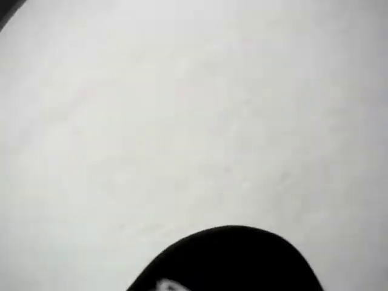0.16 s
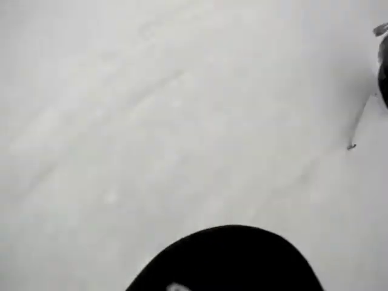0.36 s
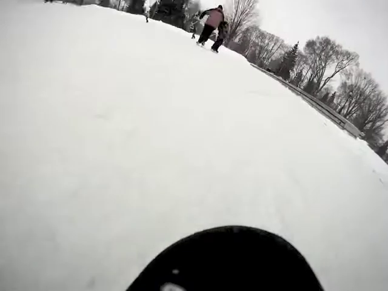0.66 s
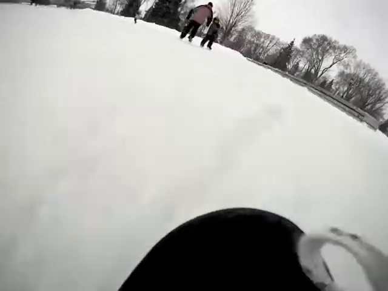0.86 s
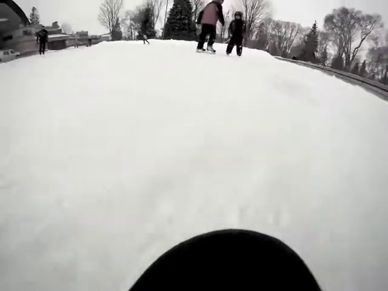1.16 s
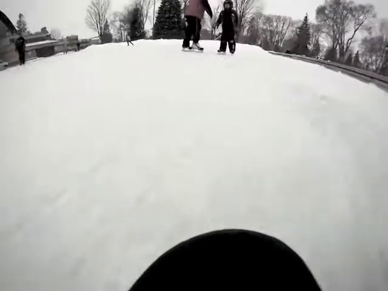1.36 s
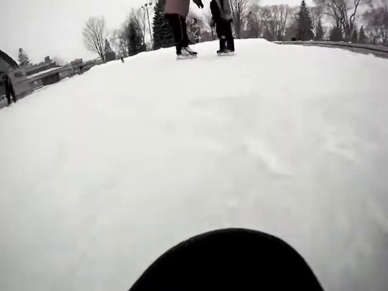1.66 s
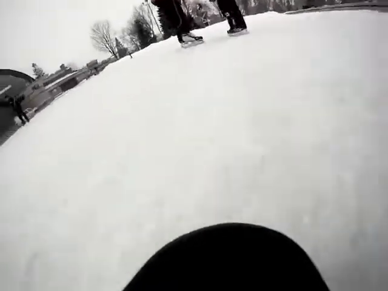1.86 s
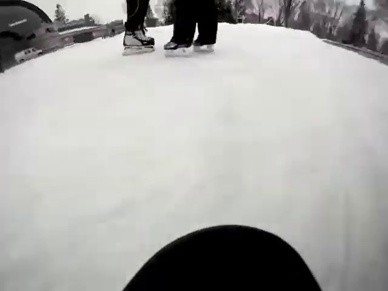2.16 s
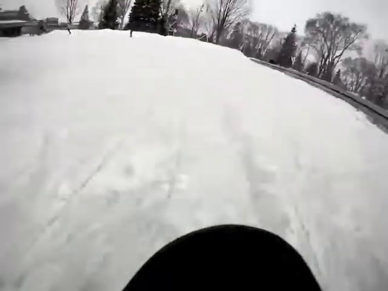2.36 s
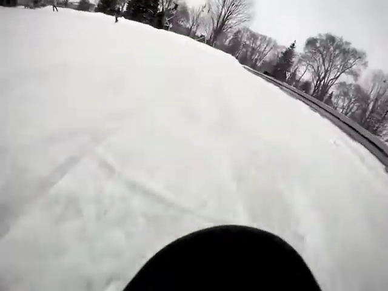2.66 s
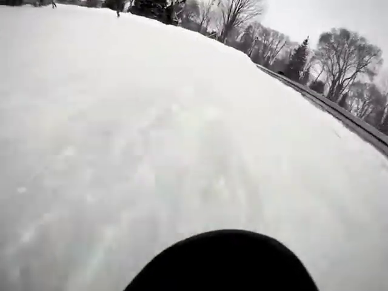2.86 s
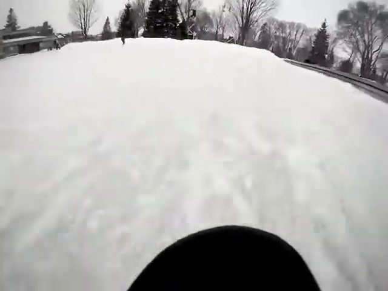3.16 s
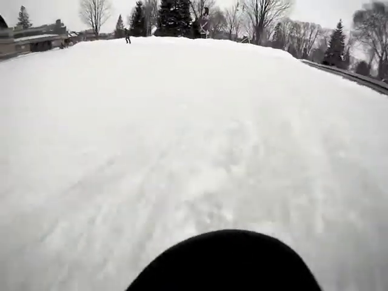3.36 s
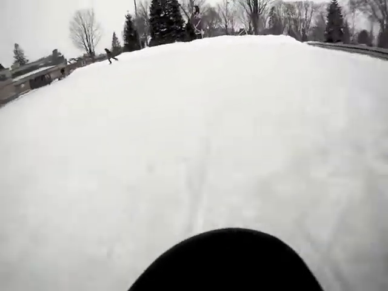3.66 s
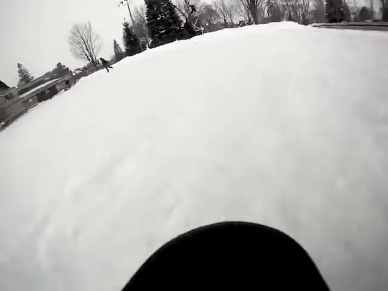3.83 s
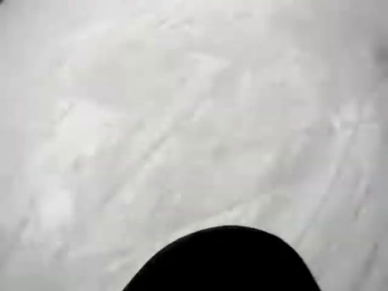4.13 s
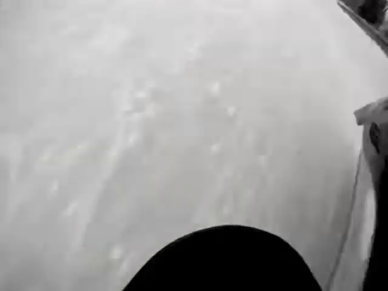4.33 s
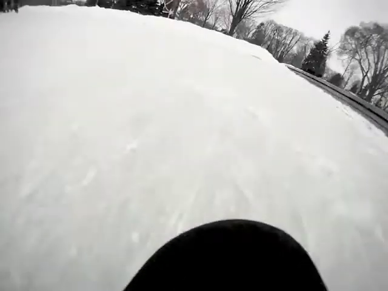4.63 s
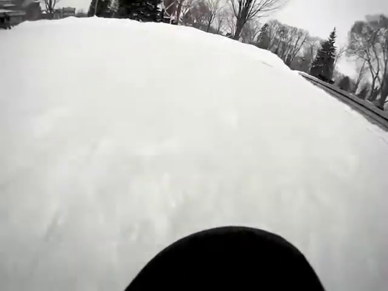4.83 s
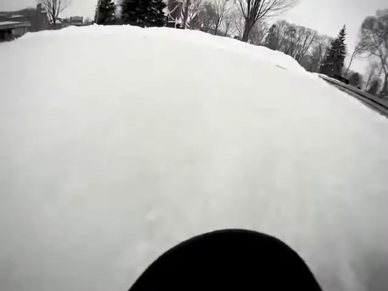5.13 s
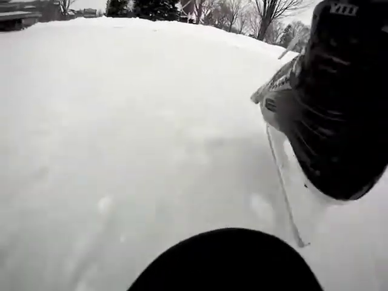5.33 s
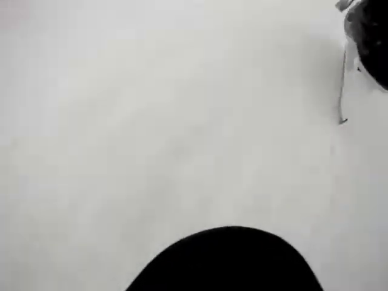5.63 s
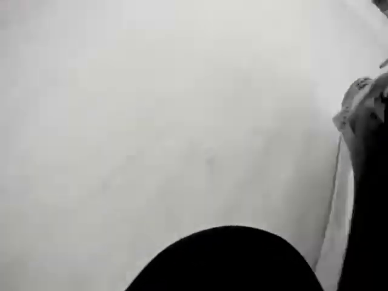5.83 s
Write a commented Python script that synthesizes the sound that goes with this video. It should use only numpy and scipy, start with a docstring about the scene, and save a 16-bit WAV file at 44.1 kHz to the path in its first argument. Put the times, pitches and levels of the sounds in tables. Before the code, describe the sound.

A small camera fixed to an ice skate hears the blade very close. A push ends at once, then low wind buffets and thumps while the other skate scrapes faintly. The blade lands with a knock, grinds through crunchy snow, pushes louder and lifts with sharp clicks. This repeats in uneven strides, outdoors and dry with no echo, the sound gritty and slightly overloaded.

```python
"""Skating on snowy outdoor ice, heard from a small camera fixed on one skate.
A push ends and the blade lifts: snow grains break as clicks that ring damped modes, chips snap the housing.
As the foot swings forward, shaped noise makes the wind, short sine pulses thump, and the other skate scrapes.
The blade lands and glides through crunching snow, with noise bursts for ruts and once a bright shaving rasp;
it rolls onto its toe, pushes and lifts, and the cycle repeats. Overload and sample holding add treble grit."""
import sys
import numpy as np
from scipy import signal
from scipy.fft import rfft, irfft
from scipy.io import wavfile
from scipy.ndimage import uniform_filter1d

SR = 44100
rng = np.random.default_rng(int(sys.argv[2]) if len(sys.argv) > 2 else 0)


def put_to_file(sound):
    """Save the sound as 16-bit audio at rate SR, in the file named by the first command-line argument."""
    columns = np.atleast_2d(sound).T  # one column per channel
    safe = np.clip(columns, -1, 1)
    whole_steps = np.round(safe * 32767)
    wavfile.write(sys.argv[1], SR, whole_steps.astype(np.int16))


N = 264153
TIME = np.arange(N) / SR

# strides of this skate: landing t/s, roll onto the toe t/s, lift t/s, relative glide growl level/dB,
# relative glide hiss level/dB, swell over the glide/dB, relative push growl level/dB, relative push hiss level/dB
STRIDES = [(-1, -.1, .062, -27, -27, 0, -18.5, -28.5), (.935, 1.88, 1.982, -27.3, -27.4, 8, -19.3, -27.3),
           (2.858, 3.85, 3.958, -26.5, -26.8, -1, -19.5, -30.5),
           (4.695, 5.415, 5.668, -32, -35, -2, -18.6, -28)]
# times for the blade's gain to change by 20 dB as it lands, rolls onto the toe and lifts, in s
LAND_S, ROLL_S, LIFT_S = .012, .05, .022


def from_db(db):
    """Logarithmic level: amplitude gain is ten to the power dB/20."""
    return 10 ** (np.asarray(db) / 20)


def rms(x):
    """Mean power: its square root is the effective amplitude."""
    return np.sqrt(np.mean(x ** 2) + 1e-20)


def butter(x, hz, kind, order=2):
    """Causal filtering with a maximally flat (Butterworth) passband."""
    return signal.sosfilt(signal.butter(order, hz, kind, fs=SR, output="sos"), x)


def drift(rate, size=4096 * 4):
    """Low-passed random process: about `rate` turns a second on a coarse time grid, with spread 1."""
    hz = np.arange(size // 2 + 1) * SR / N
    spectrum = rfft(rng.standard_normal(size)) / (1 + (hz / rate) ** 2)
    slow = irfft(spectrum, size)
    return np.interp(np.linspace(0, size - 1, N), np.arange(size), slow / rms(slow))


def evened(x, span_s):
    """Power normalization: hold the level at 1 over span_s, keeping all faster flutter."""
    power = np.abs(uniform_filter1d(x ** 2, int(span_s * SR) + 1))
    return x / np.sqrt(power + 1e-12)


def held(start, end, attack_s, release_s):
    """Exponential growth and decay: gain 1 from start to end, 20 dB per attack_s before, per release_s after."""
    corners = [start - 10 * attack_s, start, end, end + 10 * release_s]
    return np.exp(np.log(10) * np.interp(TIME, corners, [-10, 0, 0, -10]))


def ramp(start, end):
    """Linear change from -1/2 at start to +1/2 at end, constant outside."""
    return np.interp(TIME, [start, end], [-.5, .5])


def changes(rows):
    """Successive gains add in dB: sum of stretches (from t/s, to t/s, change/dB) with sloping edges."""
    edge_s = .02
    return sum(db * np.interp(TIME, [start - edge_s, start, end, end + edge_s], [0, 1, 1, 0])
               for start, end, db in rows)


def resonate(x, modes):
    """Modal superposition: parallel two-pole resonances with alternating signs."""
    out = 0
    for k, (hz, width, db) in enumerate(modes):
        r = np.exp(-np.pi * width / SR)   # the wider the mode, the faster it decays
        poles = [1, -2 * r * np.cos(2 * np.pi * hz / SR), r * r]
        zeros = np.array([1, 0, -1]) * (1 - r * r) / 2
        out = out + (-1) ** k * from_db(db) * signal.lfilter(zeros, poles, x)
    return out


def add(out, centre_s, sound):
    """Linear superposition of a short sound whose centre lies 8 ms after its start."""
    start = max(0, int((centre_s - .008) * SR))
    out[start:start + len(sound)] += sound[:N - start]


def contact():
    """Load on the ice sets the gains (growl, hiss) of the glide, the toe push and the thin scrapes through air."""
    # rough (+) and smooth (-) ice under the gliding blade: from t/s, to t/s, change/dB
    patches = [(1.04, 1.11, 2.5), (1.19, 1.21, -3), (1.34, 1.42, -1.5), (1.48, 1.6, 2.5), (2.86, 2.91, -5),
               (2.95, 2.99, 2.5), (3.02, 3.125, -8.5), (3.18, 3.25, 3.5), (3.4, 3.54, 1.5),
               (3.632, 3.66, -9), (3.7, 3.73, -4), (4.71, 4.81, 7), (5.03, 5.085, -5), (5.14, 5.27, 3)]
    # scrapes of the other skate: from t/s, to t/s, relative growl level/dB, relative hiss level/dB
    far_strokes = [(.21, .27, -41, -37.5), (.49, .7, -39, -36.3), (.76, .92, -40.5, -40.5),
                   (2.17, 2.25, -33, -39), (2.41, 2.52, -35.5, -34), (2.54, 2.59, -34, -28.5),
                   (2.72, 2.85, -41, -38), (4.28, 4.44, -33, -34), (4.62, 4.645, -43, -30),
                   (5.82, 5.9, -42, -39.5), (5.94, 6, -33, -35)]
    # the toe pick brushes the snow just after each lift: t/s, relative growl level/dB, relative hiss level/dB
    brushes = [(.145, -43, -38), (2.01, -38, -38), (2.032, -36, -26.5), (2.07, -45, -35), (4.021, -38, -33)]
    far_attack_s, far_release_s = .11, .07
    brush_attack_s, brush_release_s = .035, .04
    far_glide_db = [[-43.5], [-46]]   # the other skate's steady glide between scrapes: relative growl, hiss

    ice_db = changes(patches)
    glide, push, other = 0, 0, from_db(far_glide_db)
    for land, toe, lift, growl_db, hiss_db, swell_db, push_growl_db, push_hiss_db in STRIDES:
        weight = held(land, toe, LAND_S, ROLL_S) * from_db(swell_db * ramp(land, toe) + ice_db)
        glide = glide + from_db([[growl_db], [hiss_db]]) * weight
        push = push + from_db([[push_growl_db], [push_hiss_db]]) * held(toe, lift, ROLL_S, LIFT_S)
    for start, end, growl_db, hiss_db in far_strokes:
        stroke = from_db([[growl_db], [hiss_db]]) * held(start, end, far_attack_s, far_release_s)
        other = np.maximum(other, stroke)
    for s, growl_db, hiss_db in brushes:
        brush = from_db([[growl_db], [hiss_db]]) * held(s, s, brush_attack_s, brush_release_s)
        other = np.maximum(other, brush)
    return glide, push, other


def crushing(per_s, size_db, powder):
    """Brittle fracture of snow grains under steel: clicks of very unequal size on a bed of powder hiss."""
    sizes = from_db(size_db * np.minimum(rng.exponential(1, N), 4)) * rng.choice([-1, 1], N)
    clicks = sizes * (rng.random(N) < per_s / SR)
    return clicks / rms(clicks) + powder * rng.standard_normal(N)


def wandering(force, modes, wander_s, swell_db, bend=0):
    """Moving excitation point: as the contact slides along the blade, each mode bends in pitch and swells."""
    out, n, lead = 0, np.arange(N), np.cumsum(bend)
    for hz, width, db in modes:
        ring = resonate(force, [(hz, width, db)])
        ring = resonate(ring, [(hz, 4 * width, 0)])   # a wider second pass steepens the skirts
        shift = np.sqrt(700 / hz) * (lead + wander_s * SR * drift(16.3))   # low modes bend more
        bent = np.interp(n + shift, n, ring)
        out = out + bent * from_db(swell_db * drift(8.6))
    return out


def toe_bend():
    """Modes shift with the contact: each push it moves toward the blade tip and the playback rate rises."""
    rise = .2   # share by which a 700 Hz mode rises over a push
    return rise * sum(ramp(toe, lift) * (TIME > toe) * (TIME < lift + LIFT_S)
                      for _, toe, lift, *_ in STRIDES[1:])


def scrape(modes, force, gains, low_cut_hz, bumps_db, chatter_db, wander_s, swell_db, growl_db, hiss_db, bend=0):
    """Forced resonance: crushed snow rings the skate; bumps and edge chatter shake all pitches together."""
    split_hz = 1600   # growl below, hiss above
    growl, hiss = gains
    grip = from_db(bumps_db * drift(59) + chatter_db * drift(200))
    ringing = wandering(force * grip, modes, wander_s, swell_db, bend)
    body = butter(ringing, low_cut_hz, "high", order=3)
    low = butter(body, split_hz, "low", order=5)
    high = butter(body, split_hz, "high", order=5)
    # the growl's level is set by its part above 750 Hz
    to_growl = rms(low) / rms(butter(low, 750, "high", order=8))
    growling = growl * from_db(growl_db) * to_growl * evened(low, 0.06)
    hissing = hiss * from_db(hiss_db) * evened(high, 0.05)
    return growling + hissing


def blades(gliding, pushing, far):
    """Boundary conditions set the modes: flat glide, smoother toe push, and far skate with toe-pick brushes."""
    # blade, boot and housing with the blade flat on the ice: f/Hz, width/Hz, relative level/dB
    flat_modes = [(520, 132, 3), (697, 92, 6), (934, 160, 1.5), (1330, 280, -3.5), (1950, 390, -4.5),
                  (2800, 150, 0), (3790, 410, -13), (4330, 480, -23), (5430, 350, -40)]
    # the same with the toe digging in: f/Hz, width/Hz, relative level/dB
    toe_modes = [(593, 130, 0.5), (717, 130, 3), (1014, 230, -4.5), (1210, 133, -2), (1760, 540, -13.5),
                 (2693, 190, -7.5), (3700, 370, -16.5), (4600, 640, -73)]
    # the other skate, heard through the air: f/Hz, width/Hz, relative level/dB
    far_modes = [(672, 145, 0.5), (1210, 460, -1.5), (1830, 340, -4), (2190, 210, -3), (2790, 470, 3.5),
                 (3650, 500, -3.5), (4950, 310, -12.5), (5240, 480, -12.5)]

    coarse_crunch = crushing(per_s=1700, size_db=3.5, powder=0.8)
    glide = scrape(flat_modes, coarse_crunch, gliding, low_cut_hz=297, bumps_db=4.2, chatter_db=1.0,
                   wander_s=0.00051, swell_db=2.0, growl_db=1.5, hiss_db=2.2)
    dense_crunch = crushing(per_s=3700, size_db=5.0, powder=0.58)
    push = scrape(toe_modes, dense_crunch, pushing, low_cut_hz=390, bumps_db=1.7, chatter_db=0.6,
                  wander_s=0.00048, swell_db=2.2, growl_db=-0.5, hiss_db=2.2, bend=toe_bend())
    fine_crackle = crushing(per_s=1500, size_db=3.2, powder=.7)
    other = scrape(far_modes, fine_crackle, far, low_cut_hz=400, bumps_db=3.3, chatter_db=1.0,
                   wander_s=.0004, swell_db=4.4, growl_db=-2.5, hiss_db=0.7)
    return glide + push + other


def airflow():
    """Flow speed sets the wind's gains (rumble, rush): steady glide, low push, surge as the lifted foot swings."""
    # wind in each stride: relative glide level/dB, following swing is fastest t/s, time to rise 20 dB/s,
    # relative level of that swing/dB, its rumble against its rush/dB
    winds = [(-27, .27, .075, -22.5, 1), (-27.4, 2.145, .09, -18.8, -4), (-29.2, 4.18, .105, -20, -2.5),
             (-31.6, 5.92, .22, -23, 2.5)]
    # gusts (+) and lulls (-): from t/s, to t/s, change/dB
    gusts = [(.32, .36, -10), (.5, .53, -6), (.7, .9, 4), (1.0, 1.11, -8), (3.31, 3.41, -4),
             (3.45, 3.63, 3), (3.67, 3.72, -7), (5.05, 5.1, -4), (5.18, 5.26, 5.5)]
    calm_rumble_db, calm_rush_db = -42, -53   # relative floor, around the lift
    push_rush_db = -34.5   # relative rush while the foot is planted
    glide_rumble_db = 4   # rumble of the glide against its rush
    plant_s = .1   # the wind of the glide dies by 20 dB in this time
    swing_hold_s, swing_release_s = .1, 1.9   # a swing's wind holds, then falls 20 dB per release

    wind = from_db([[calm_rumble_db], [calm_rush_db]])
    landings = [row[0] for row in STRIDES[1:]] + [TIME[-1]]
    for stride, row, next_land in zip(STRIDES, winds, landings):
        land, toe, lift, *_ = stride
        glide_db, fastest, attack_s, swing_db, rumble_db = row
        glide = from_db([[glide_db + glide_rumble_db], [glide_db]]) * held(land, toe, plant_s, plant_s)
        push = from_db([[calm_rumble_db], [push_rush_db]]) * held(toe, lift - plant_s / 2, ROLL_S, ROLL_S)
        surge = held(fastest, fastest + swing_hold_s, attack_s, swing_release_s)
        surge = surge * held(lift, next_land, LIFT_S, ROLL_S)   # only while the foot is in the air
        swing = from_db([[swing_db + rumble_db], [swing_db]]) * surge
        wind = np.maximum(np.maximum(wind, push), np.maximum(glide, swing))
    return wind * from_db(changes(gusts))


def coloured_noise(spectrum):
    """Spectral shaping: white noise weighted by levels interpolated over log frequency."""
    hz, db = np.transpose(spectrum)
    bins = np.arange(1, N // 2 + 2) * SR / N
    weights = from_db(np.interp(np.log(bins), np.log(hz), db, right=-120))
    return irfft(rfft(rng.standard_normal(N)) * weights, N)


def buffeting(rumble_db, rush_db, gust_db):
    """Turbulent pressure on the microphone: a deep rumble, and a rush that swells as the foot swings forward."""
    # spectrum of the deep eddies: f/Hz, relative spectral level/dB
    rumble_spectrum = [(15, -25), (30, -5.5), (50, -1), (100, -1.5), (135, -2), (200, -21), (400, -50)]
    # spectrum of the quicker eddies: f/Hz, relative spectral level/dB
    rush_spectrum = [(70, -41), (115, -11), (160, -1.5), (230, -3), (320, -7), (440, -8), (560, -10.5),
                     (700, -21.5), (900, -35), (1500, -47)]
    rumble, rush = airflow()
    eddies = from_db(gust_db * drift(26))
    deep = evened(eddies * coloured_noise(rumble_spectrum), 0.097)
    quick = evened(eddies * coloured_noise(rush_spectrum), 0.13)
    return rumble * from_db(rumble_db) * deep + rush * from_db(rush_db) * quick


def small_bumps(gains):
    """Random impacts whose strength follows the scrape; rows like those of the ruts."""
    per_s, length_s, mean_hz, spread_octaves = 7, .0025, 720, .4
    # thud, knock and crack relative to the scrape of the moment, and the spread of the last two
    thud_db, knock_db, crack_db, spread_db = -1, 4, 2.5, 1.5
    count = int(per_s * N / SR)
    at = (rng.random(count) * N).astype(int)
    growl_db, hiss_db = 20 * np.log10(gains[:, at])
    pitch, knock, crack = rng.standard_normal((count, 3)).T
    return list(zip(at / SR,
                    np.full(count, length_s),
                    mean_hz * 2 ** (spread_octaves * pitch),
                    growl_db + thud_db,
                    growl_db + knock_db + spread_db * knock,
                    hiss_db + crack_db + spread_db * crack))


def burst(length_s, modes, edges_hz):
    """Impulsive excitation of damped modes: brief fractures about 8 ms, with the energy of rms 1 over 6 ms."""
    t = np.arange(SR // 25) / SR - .008
    fractures = rng.standard_normal(len(t)) * np.exp(-.5 * (t / length_s) ** 2)
    ring = butter(resonate(fractures, modes), edges_hz, "band")
    return ring / np.sqrt(np.sum(ring ** 2) / (.006 * SR))


def knocks(rows):
    """Impact: a rut thumps the boot, knocks the holder at a pitch set by where it hits, and cracks the ice."""
    out = np.zeros(N)
    # fracturing ice: f/Hz, width/Hz, relative level/dB
    crack_modes = [(1850, 1000, -4), (2887, 257, 1.5), (3580, 253, -8.5), (5110, 1700, -23.5)]
    for s, length, hz, thud_db, knock_db, crack_db in rows:
        thud = burst(0.45 * length, [(259, 1340, 0)], [120, 520])
        knock = burst(.38 * length, [(hz, 200, 0), (1300, 450, -13)], [380, 1700])
        crack = burst(0.53 * length, crack_modes, [1500, 5800])
        add(out, s - .0015, from_db(thud_db + 1.5) * thud)
        add(out, s - .001, from_db(knock_db - 4.7) * knock)
        add(out, s - .0004, from_db(crack_db - 0.73) * crack)
    return out


def ticks():
    """Impulse response: a flying chip snaps the housing cleanly, then patters faintly as it crumbles."""
    # ice chips just after the blade lifts: t/s, relative peak level/dB
    chips = [(.1195, -30), (.1715, -8.5), (2.0381, -1.5), (2.0407, -5.5), (4.0252, -4), (4.028, -13),
             (4.0402, -13)]
    # the housing, struck by a chip: f/Hz, width/Hz, relative level/dB
    housing_modes = [(2000, 870, 1.5), (3300, 2000, -1), (4700, 900, -2.5)]
    out, t = np.zeros(N), np.arange(SR // 25) / SR
    onset = int(.008 * SR)
    for s, db in chips:
        force = 0.054 * rng.standard_normal(len(t)) * np.exp(-t / 0.0016)
        force[0] = 1
        snap = butter(resonate(force, housing_modes), [900, 5600], "band")
        snap = snap / np.abs(snap).max()
        add(out, s, from_db(db + 1.7) * np.pad(snap, (onset, 0)))
    return out


def thumps(cycles=0.4):
    """Transient pressure pulse: each soft thump is a sine swing of a cycle or two under a Gaussian envelope."""
    # low thumps as the foot swings: t/s, f/Hz, relative peak level/dB
    pulses = [(0.261, 211, -14), (0.283, 110, -7), (0.409, 159, 0.5), (0.46, 110, -5.5), (0.586, 141, -1.5),
              (2.24, 182, -4), (2.257, 210, -11), (4.326, 109, -8), (4.458, 187, 0.5)]
    out, t = np.zeros(N), np.arange(SR // 25) / SR - .008
    for s, hz, db in pulses:
        swell = np.exp(-.5 * (t * hz / cycles) ** 2)
        swell = swell * np.minimum((t - t[0]) / .002, 1)   # starts from zero without a click
        add(out, s, from_db(db - 2.5) * swell * np.sin(2 * np.pi * (hz * t + rng.random())))
    return out


def shaving():
    """Brittle cutting excites resonance: the edge shaves rough ice, a bright rasp with a hollow tone under it."""
    # what the shaving rings with: f/Hz, width/Hz, relative level/dB
    rasp_modes = [(630, 78, -6), (2800, 380, -2), (5170, 800, -11)]
    start_s, end_s, edge_s = 3.155, 3.283, .02
    level_db, swell_db = -24, 6
    level = from_db(level_db + swell_db * ramp(start_s, end_s)) * held(start_s, end_s, edge_s, edge_s)
    flakes = crushing(per_s=2500, size_db=3.6, powder=.5)
    return level * evened(wandering(flakes, rasp_modes, wander_s=.0006, swell_db=4.0), .05)


def scene():
    """Free-field superposition: everything is close and in the open, with no echo."""
    # blades striking ruts: t/s, length scale/s, knock f/Hz, relative thud, knock and crack levels/dB
    ruts = [(.009, .0026, 680, -20, -14, -24), (.0356, .0025, 710, -38, -10, -24),
            (.0401, .0031, 680, -36, -7, -20.5), (.054, .0038, 620, -15, -3, -12),
            (.0762, .0017, 660, -39, -7.5, -26), (.0833, .0039, 1000, -36, -13, -31),
            (.1446, .0062, 1410, -58, -33, -22), (.555, .0049, 533, -24, -19, -22),
            (.6125, .0035, 540, -40, -17, -17), (.6245, .0016, 515, -16, -4, -14),
            (.7108, .0047, 530, -33, -12, -26), (.7174, .0021, 530, -22, -10.5, -18),
            (.7464, .0017, 530, -24, -30, -24.5), (.7609, .0011, 550, -25, -18, -29),
            (.9372, .0022, 540, -6.5, -3.5, -9), (.9958, .0015, 1390, -35, -21, -13.5),
            (1.1696, .0019, 654, -15.5, -3.5, -20), (1.239, .0033, 726, -15, -20, -19.5),
            (1.3018, .0026, 550, -13.5, -20, -19.5), (1.329, .0045, 760, -14, -18, -15.5),
            (1.3348, .0024, 470, -17, -25, -20), (1.4333, .0052, 600, -16.5, -11.5, -17.5),
            (1.5386, .0017, 1280, -33, -9, -14.5), (1.573, .0038, 620, -19, -12, -14.5),
            (1.605, .0048, 710, -37, -5.5, -14), (1.7699, .0026, 626, -24, -8.5, -23),
            (1.8802, .0027, 650, -12, -6, -17), (1.9093, .0026, 725, -35, -5, -28),
            (1.9227, .0036, 990, -22, -3.5, -21.5), (1.959, .0032, 835, -32, -13, -15.5),
            (2.468, .0051, 510, -19.5, -19, -31), (2.5936, .0028, 500, -5.5, -18, -19),
            (2.6967, .002, 546, -19.5, -21, -19.5), (2.7835, .0044, 650, -16.5, -10.5, -15),
            (2.806, .0022, 580, -16, -11, -18), (2.8537, .002, 567, -4, 1, -18.5),
            (2.9623, .005, 880, -41, -14, -19), (2.9955, .0036, 940, -50, -8.5, -25),
            (3.0286, .003, 720, -24, -26, -17), (3.0536, .0021, 820, -13, -6.5, -14.5),
            (3.088, .0032, 790, -30, -11.5, -16), (3.1146, .0059, 870, -19, -14.5, -17.5),
            (3.2856, .0046, 650, -15.5, -6, -26), (3.4518, .0025, 504, -12.5, -9.5, -16),
            (3.6195, .004, 900, -15, -9, -11), (3.6495, .002, 1070, -12, -5, -7.5),
            (3.7271, .0051, 550, -18.5, -17, -18.5), (3.739, .0031, 540, -24, -7, -20),
            (3.758, .0031, 510, -30, -5.5, -17), (3.776, .0044, 550, -33, -22, -21),
            (3.833, .0041, 590, -24, -13, -14), (3.862, .0061, 940, -20, -9, -12.5),
            (3.9097, .0012, 880, -37, -9, -26), (3.9144, .0013, 660, -35, -6, -24),
            (3.9242, .0029, 840, -14.5, -2, -7.5), (4.5946, .0032, 540, -42, -20.5, -29.5),
            (4.679, .0018, 490, -14, -20, -21), (4.6967, .0065, 880, -12, -11, -14.5),
            (4.771, .0042, 560, -19, -16, -14.5), (4.785, .0027, 824, -22, -10.5, -25),
            (4.8375, .0021, 620, -11.5, -3, -17), (4.9348, .0015, 660, -11.5, -4, -17),
            (4.986, .0051, 540, -17, -14, -21.5), (5.009, .0021, 624, -13, -3, -15),
            (5.187, .006, 600, -18, -21, -20), (5.2235, .0074, 650, -28, -13, -25),
            (5.26, .0081, 770, -20, -8, -27), (5.332, .0023, 714, -37, -17, -28),
            (5.3637, .0017, 730, -24, -9, -25), (5.4065, .0016, 1270, -22, -12.5, -22.5),
            (5.4355, .0022, 800, -37, -11, -26), (5.4423, .0043, 726, -24, -3.5, -21),
            (5.588, .0031, 1070, -45, -7.5, -30.5), (5.6047, .0018, 870, -32, -4, -30),
            (5.6684, .0017, 650, -27, -9.5, -23.5), (5.817, .0023, 490, -25.5, -29, -24)]
    glide, push, other = contact()
    air = buffeting(rumble_db=0.8, rush_db=0.5, gust_db=2.4) + thumps()
    bumps = knocks(small_bumps(glide + other))
    ice = blades(glide, push, other) + shaving() + ticks() + knocks(ruts) + bumps
    return (ice + air)[None]


def record(dry):
    """Saturation and spectral imaging: peaks overload, and held slow samples mirror the sound into gritty treble."""
    slow_hz, overload, cutoff_hz = 12000, .85, 15300
    slow = signal.resample_poly(dry, slow_hz, SR, axis=-1, window=("kaiser", 3))
    slow = slow / (1 + (slow / overload) ** 8) ** (1 / 8)
    steps = np.repeat(slow, 4, axis=-1)   # each sample is held
    stepped = signal.resample_poly(steps, SR, 4 * slow_hz, axis=-1)[:, :N]
    low_pass = signal.firwin(161, cutoff_hz, window="blackman", fs=SR)
    return np.convolve(stepped[0], low_pass, "same")[None]


dry = scene()
out = record(dry)
put_to_file(out)
```